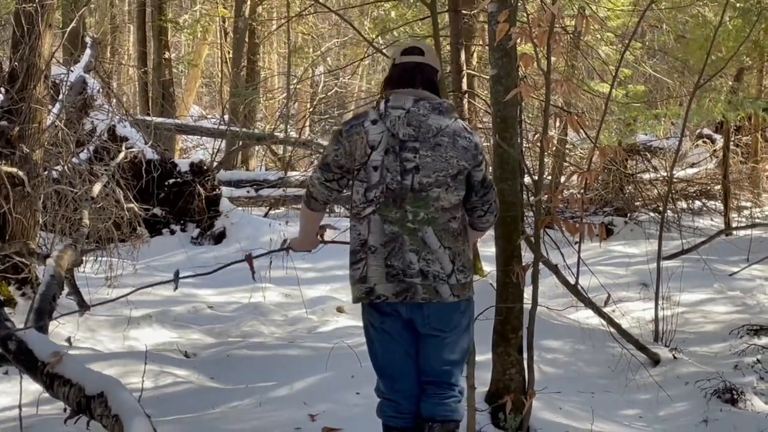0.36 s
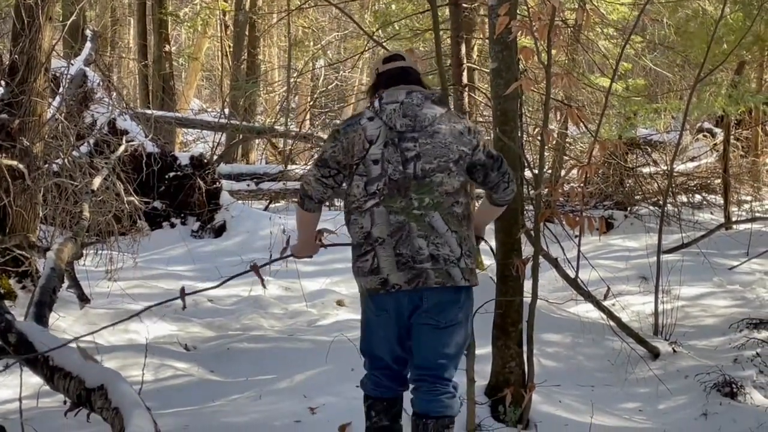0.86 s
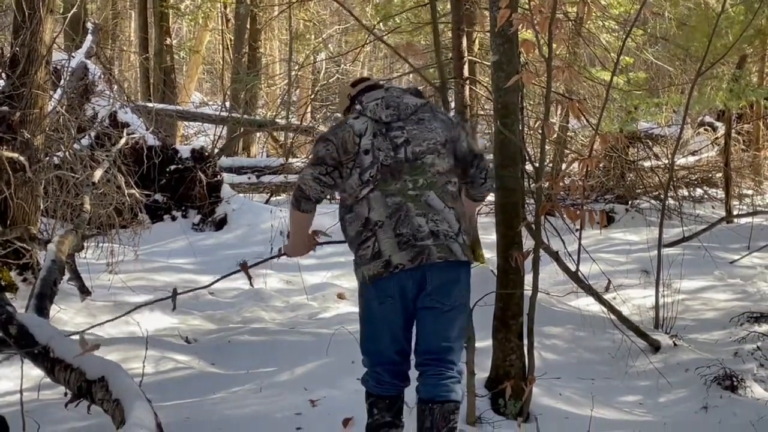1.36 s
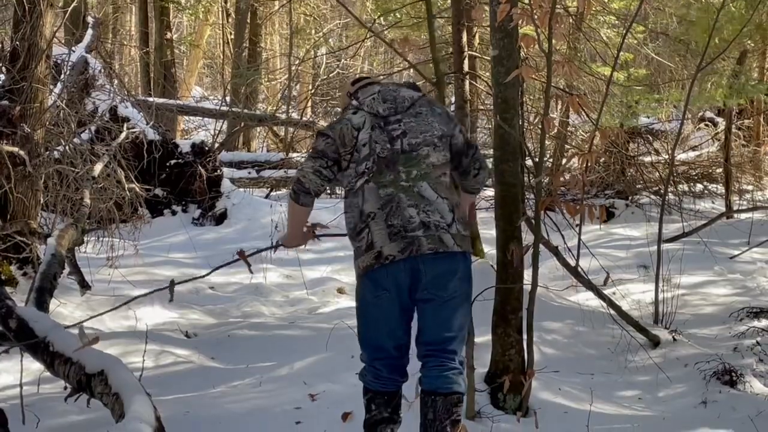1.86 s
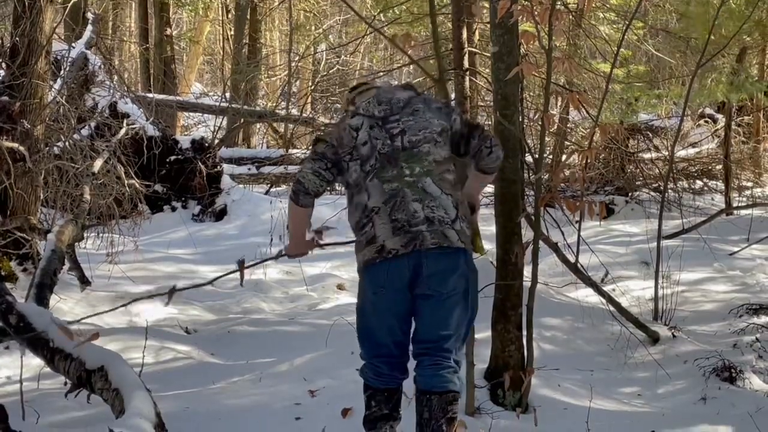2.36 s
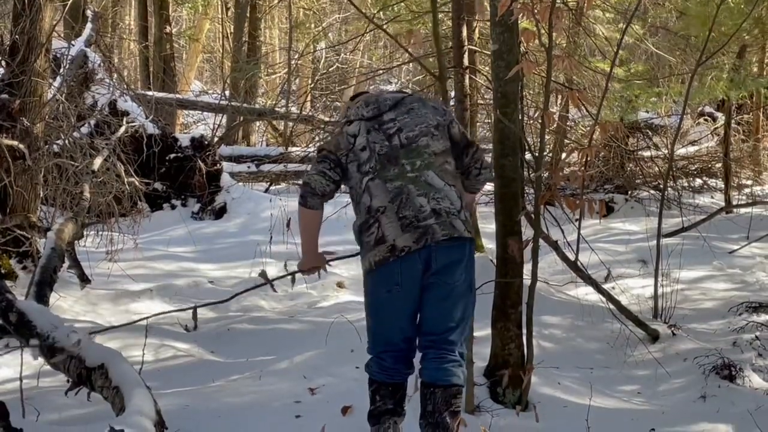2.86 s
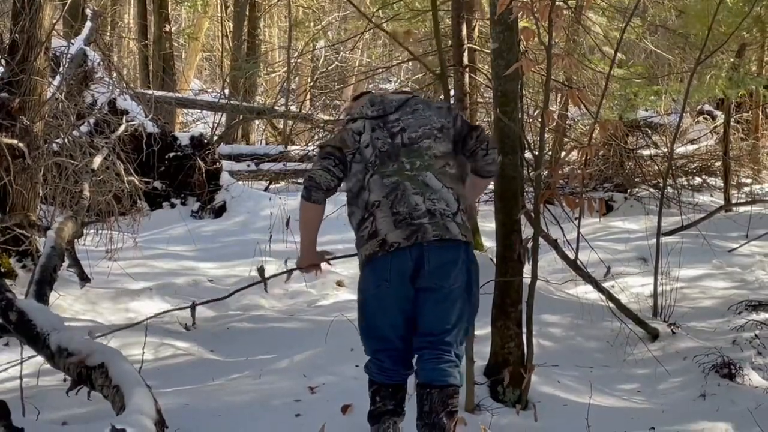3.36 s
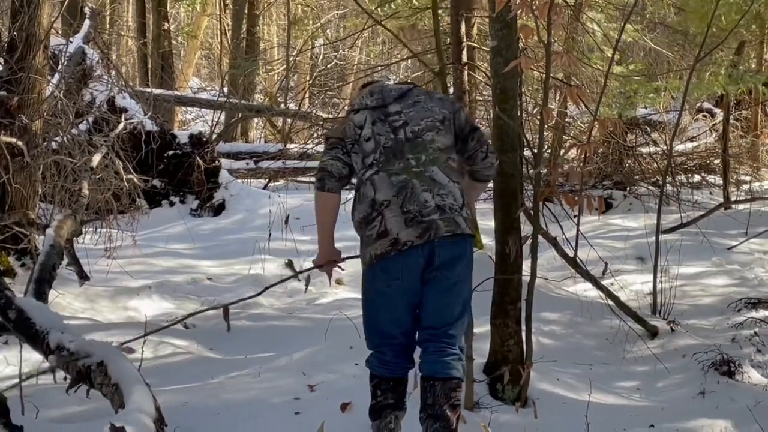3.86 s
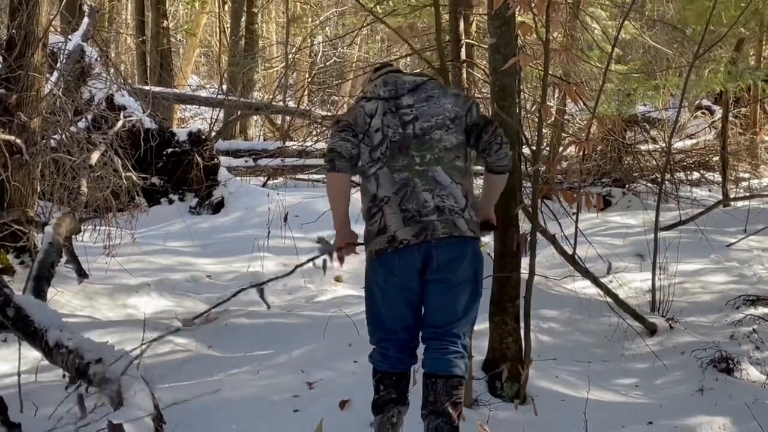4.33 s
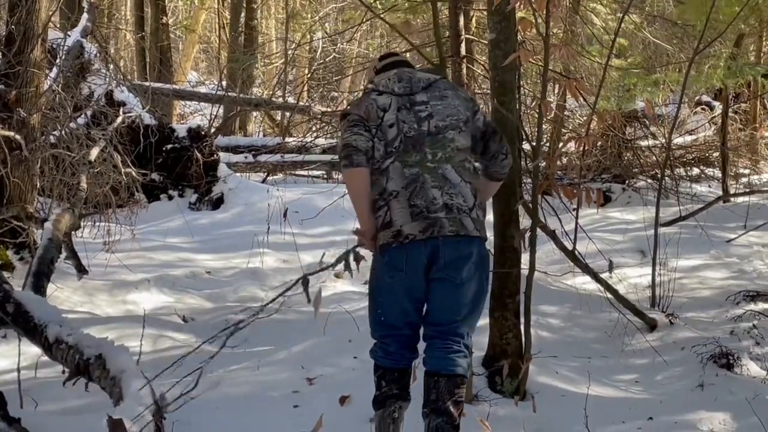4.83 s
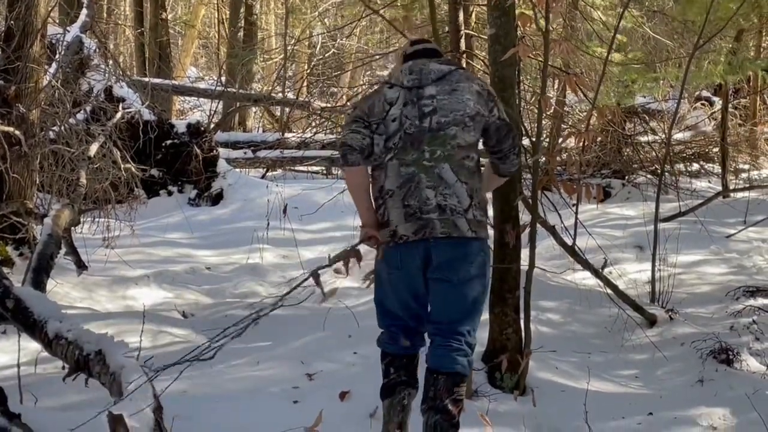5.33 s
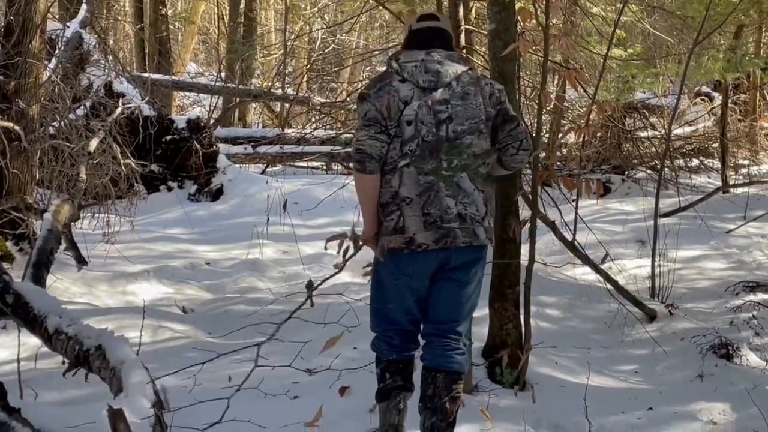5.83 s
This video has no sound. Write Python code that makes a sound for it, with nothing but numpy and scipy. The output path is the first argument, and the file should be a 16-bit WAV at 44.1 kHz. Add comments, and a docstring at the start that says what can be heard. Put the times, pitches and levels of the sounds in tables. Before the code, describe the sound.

In a quiet winter wood, a twiggy branch rustles briefly, sinks to a lull, then is tugged in short jerks. Twigs tick and snap, sharply near the middle. The thick end scrapes low on crusted snow, boots or wood thud softly, and stronger jerks come late before the rustle eases. Close, dry, clear stereo pickup.

```python
"""A leafy cut branch is tugged in short jerks through brush and over crusted snow, in faint winter-wood air.
Friction noise and tiny decaying ticks rustle from the start, with short jerks, and soon sink to a lull.
Twigs then snap as damped rings with cracks, and boots press the snow as thuds of sinking pitch. The drag grows,
with a sharp snap at 2.6 s; the bough's low filtered-noise scrape swells by 3.4 s, strong jerks follow at
4.1 to 4.7 s with a heavy thud at 4.6 s, and the rustle eases until it falls away after the last snaps."""
import sys
import numpy as np
from scipy import signal
from scipy.fft import rfft, irfft, next_fast_len
from scipy.io import wavfile
from scipy.ndimage import uniform_filter1d

SR = 44100
rng = np.random.default_rng(int(sys.argv[2]) if len(sys.argv) > 2 else 0)


def invert_db(x):
    """Field ratio 10**(x/20) for x, a level in decibels (scalar or array-like)."""
    u = np.asarray(x, float) / 20
    return 10 ** u


def int16_out(signal):
    """Quantize to a 16-bit WAV file."""
    q = np.round(np.clip(np.atleast_2d(signal).T, -1, 1) * 32767)
    wavfile.write(sys.argv[1], SR, q.astype(np.int16))


N = 262659
TIME = np.arange(N) / SR
FREQ = np.fft.rfftfreq(next_fast_len(N), 1 / SR)
SHORT, LONG = np.arange(512) / SR, np.arange(8192) / SR  # time axes of single events, s

# twigs snapping free: t/s, peak level before colouring/dB, ring f/Hz, crack gain against the ring/dB,
# drive of the leaves shivering after it/dB
TWIG_SNAPS = [(0.421, -27.5, 6940, 1, -48), (0.435, -32, 5150, 0, -54), (0.57, -36, 6100, -2, -76),
              (0.659, -29, 4660, -13, -48), (1.1985, -34, 3980, -33, -53), (1.2504, -23, 3760, -22, -45),
              (1.2533, -29, 2980, -16, -47), (1.2605, -39, 4260, -25, -55), (1.2985, -43, 3500, -22, -64),
              (1.3845, -22, 3400, -12, -52), (1.4015, -36, 4200, -28, -59), (1.436, -33, 3970, -31, -64),
              (1.5163, -23, 5200, -22, -54), (1.6212, -27, 4820, -12, -52), (1.687, -35, 3930, -12, -48),
              (1.777, -31, 5970, -28, -50), (1.8352, -35.5, 2200, -30, -66),
              (1.9065, -33, 4020, -11, -43.5), (1.9402, -30, 6000, -10, -53),
              (1.9438, -13.5, 6150, 0, -40.5), (2.1022, -26, 6000, -39, -58), (2.218, -38, 4140, -31, -44),
              (2.455, -38, 5900, -21, -49), (2.625, -8, 5750, -9, -56), (2.6854, -32.5, 2930, -23, -52),
              (2.7505, -38, 4500, -15, -60), (2.7712, -26.5, 6200, -30, -46),
              (2.8943, -30.5, 4000, -26, -63), (2.9435, -21.5, 6120, -38, -36.5),
              (3.0778, -21.5, 5600, -20, -48), (3.266, -30, 5700, -38, -42), (3.3343, -26, 2250, -24, -57),
              (3.452, -23, 6000, 0, -60), (3.475, -23, 5170, -20, -54), (3.5733, -35, 6400, -19, -42),
              (3.5972, -23, 5430, -15, -49), (3.6726, -22, 5300, -18, -50), (3.6886, -35, 5040, -20, -52),
              (3.75, -20, 5460, -19, -38.5), (3.8717, -36, 2300, -23, -68), (3.918, -22, 4700, -10, -46),
              (3.9915, -24, 6650, -41, -41), (4.063, -30, 4130, -34, -65), (4.1091, -32, 4970, -36, -65),
              (4.13, -38, 4760, -23, -53), (4.1415, -29, 5000, -22, -60), (4.2216, -30, 2960, -18, -49),
              (4.245, -24, 3000, -18, -52), (4.2713, -30, 4150, -27, -56), (4.369, -26, 5640, -9, -55),
              (4.3818, -23, 5000, -20, -58), (4.4555, -43, 2320, -15, -62), (4.5146, -29.5, 5600, -24, -46),
              (4.56, -29, 2150, -17, -52), (4.6847, -32, 2070, -27, -69), (4.9206, -35.5, 5470, -27, -55),
              (5, -31, 7100, -18, -49), (5.022, -27, 2900, -14, -46), (5.1646, -28, 6250, -24, -60),
              (5.3707, -25, 5600, -12, -67), (5.42, -32, 5550, -17, -62), (5.446, -27, 4830, -5, -52),
              (5.466, -38, 4000, -4, -52), (5.603, -39, 3680, -23, -58), (5.649, -28, 5170, -33, -46),
              (5.657, -35, 4520, -22, -46), (5.7243, -32, 2200, -10, -51), (5.8156, -39, 5730, -15, -44.5),
              (5.8636, -25, 3740, -9, -47)]


def along(points):
    """Interpolates (f/Hz, value) points linearly over logarithmic frequency, at every FREQ."""
    hz, value = np.transpose(points)
    return np.interp(np.log(FREQ + 1), np.log(hz + 1), value)


def colour(x, gain):
    """Linear filtering: multiplies the spectrum by a gain given at every frequency."""
    size = next_fast_len(N)
    return irfft(rfft(x, size) * gain, size)[:N]


def level(x, db):
    """Normalises mean power: scales x to an rms level in dB."""
    return x * invert_db(db) / np.sqrt(np.mean(x ** 2))


def walk(rate):
    """Random modulation: Gaussian values every 1 / rate s, joined by straight lines."""
    return 0.96 * np.interp(TIME * rate, np.arange(len(LONG)), rng.standard_normal(len(LONG)))


def place(shapes, times):
    """Superposition: adds short sounds at their times (s)."""
    out = np.zeros(N + len(LONG))
    for shape, s in zip(shapes, times):
        start = int(s * SR)
        out[start:start + len(shape)] += shape
    return out[:N]


def wood():
    """Broadband noise of faint air in the trees, slowly amplitude-modulated."""
    # spectrum of the air: f/Hz, relative density/dB
    air_spectrum = [(40, -10), (95, -2), (200, -6.5), (700, 1), (1200, -1), (2400, -6.5), (4000, -18),
                    (8000, -46), (16000, -50)]
    air = colour(rng.standard_normal(N), invert_db(along(air_spectrum)))
    return level(air * invert_db(0.22 * walk(4.0)), -57.5)


def steps(push_s=0.0095, extra_hz=340, drop_s=0.0036):
    """Damped oscillation whose pitch sinks as the snow packs under boots or the bough bumps over lumps."""
    # thuds: t/s, level before onset and decay/dB, settled f/Hz, settled cycles until decay to 1/e
    thuds = [(0.685, -42, 63, 1.6), (0.726, -33.5, 231, 1.75), (0.732, -40, 62, 1.2),
             (2.227, -39, 108, 1.2), (2.944, -30, 140, 0.6), (3.169, -41, 148, 1.9), (3.38, -34, 264, 0.93),
             (3.898, -37, 140, 0.92), (4.151, -40, 148, 0.77), (4.279, -49, 170, .83),
             (4.427, -43, 162, .83), (4.47, -36, 65.4, 1.4), (4.508, -39, 75, 0.7), (4.569, -21, 240, 0.72),
             (4.741, -44, 400, .83)]
    s, db, hz, cycles = np.transpose(thuds)[:, :, None]
    # the pitch starts extra_hz above its settled value
    turns = hz * LONG + extra_hz * drop_s * (1 - np.exp(-LONG / drop_s))
    thud = np.sin(2 * np.pi * turns) * np.exp(-LONG * hz / cycles)
    onset = 1 - np.exp(-LONG / push_s)
    return place(invert_db(db) * thud * onset, s[:, 0])


def drag(rise_s=0.012, fall_s=0.013, swell_db=1, treble_loss=0.45):
    """Power sum of steady pull and jerks: rustle drive, finest-twig share and jerk excess over the pull, in dB."""
    # steady pull on the branch: t/s, rustle drive/dB, share of the finest twigs before treble loss/dB
    steady_pull = [(0.0, -52.5, -5.5), (0.11, -62, -7.5), (0.33, -72, -1), (0.55, -60, -6),
                   (0.94, -66.5, -9), (1.15, -59.5, -9), (1.5, -54, -10.5), (1.85, -49, -10),
                   (2.3, -51, -9), (2.5, -49.5, -8.5), (3.1, -51, -8), (3.4, -47.5, -8), (4.1, -52.5, -7),
                   (4.5, -49.5, -10.5), (5.1, -57.5, -6), (5.55, -56.5, -10), (5.86, -58, -8),
                   (5.96, -72, -4)]
    # jerks that drag the twigs faster for a moment: start t/s, length/s, rustle drive before shaping/dB
    tugs = [(0.0, 0.092, -59), (0.13, 0.036, -59), (0.43, 0.016, -70), (0.662, 0.048, -56.5),
            (1.026, 0.09, -54), (1.172, 0.081, -49.5), (1.309, 0.078, -48), (1.39, 0.021, -52),
            (1.428, 0.089, -48.5), (1.58, 0.041, -49.5), (1.684, 0.032, -47), (1.904, 0.05, -48),
            (2.004, 0.066, -47.5), (2.096, 0.074, -44), (2.226, 0.035, -43.5), (2.317, 0.055, -45.5),
            (2.437, 0.051, -44.5), (2.535, 0.068, -48), (2.619, 0.082, -49), (2.748, 0.023, -47.5),
            (2.82, 0.084, -48), (2.928, 0.086, -44.5), (3.045, 0.046, -43.5), (3.141, 0.043, -44),
            (3.306, 0.052, -45.5), (3.43, 0.067, -46), (3.53, 0.084, -44.5), (3.652, 0.032, -43),
            (3.749, 0.061, -47.5), (3.86, 0.074, -43.5), (3.977, 0.041, -46), (4.116, 0.058, -38.5),
            (4.2, 0.14, -47.5), (4.371, 0.092, -38.5), (4.503, 0.016, -52), (4.56, 0.039, -45.5),
            (4.676, 0.063, -39.5), (4.756, 0.041, -50.5), (4.832, 0.06, -47), (4.958, 0.087, -49.5),
            (5.197, 0.034, -48.5), (5.334, .12, -49.5), (5.714, 0.027, -48.5), (5.775, 0.016, -50)]
    at, pull_db, fine_db = np.transpose(steady_pull)
    pull_db = np.interp(TIME, at, pull_db)
    s, length, db = np.transpose(tugs)[:, :, None]
    # a jerk gathers speed until it stops: its gain climbs from -2 to -1 dB
    swell = invert_db(swell_db * (np.clip(LONG / length, 0, 1) - 2))
    rise = np.clip(LONG / rise_s, 0, 1) * swell
    fall = np.exp(-np.maximum(LONG - length, 0) / fall_s)
    jerks = place(invert_db(db) * rise * fall, s[:, 0])
    drag_db = 20 * np.log10(np.hypot(invert_db(pull_db), jerks))
    jerk_db = drag_db - pull_db
    # treble_loss: dB of share the finest twigs lose per dB of jerk excess
    return drag_db, np.interp(TIME, at, fine_db) - treble_loss * jerk_db, jerk_db


def bough(jolt_slope=0.25, jolt_s=0.2, rumble_slope=0.3, wander_db=1.5):
    """Sliding friction of the thick end on the crust: low-passed noise, unevenly modulated, and a rumble."""
    # spectrum of the scrape: f/Hz, relative density/dB
    scrape_spectrum = [(80, -11), (110, -1), (150, 0), (400, -2.5), (800, -5), (1300, -11), (2200, -10.5),
                       (4000, -36)]
    # spectrum of the deep rumble: f/Hz, relative density/dB
    rumble_spectrum = [(22, -27), (45, -15), (58, 3), (67, 4.5), (80, -1), (130, -38)]
    # weight of the thick end on the crust: t/s, scrape gain/dB
    load = [(0.0, -56), (0.75, -55), (1.4, -57), (2.2, -53), (2.6, -54), (2.94, -50), (3.1, -55.5),
            (3.4, -48.5), (3.7, -52.5), (3.9, -50.5), (4.5, -50), (5.0, -54), (5.96, -55)]
    drag_db = drag()[0]
    weight_db = np.interp(TIME, *np.transpose(load))
    # each jerk on the twigs also jolts the bough, by how far the drag exceeds its local mean
    jolt_db = jolt_slope * (drag_db - uniform_filter1d(drag_db, int(jolt_s * SR)))
    uneven = rng.standard_normal(N) * invert_db(1.92 * walk(25) + jolt_db)
    slide = colour(uneven, invert_db(along(scrape_spectrum)))
    # the rumble follows the weight, rumble_slope dB per dB
    swell_db = wander_db * walk(9) + rumble_slope * weight_db
    deep = colour(rng.standard_normal(N) * invert_db(swell_db), invert_db(along(rumble_spectrum)))
    return level(slide, 0) * invert_db(weight_db) + level(deep, -62.5)


def snaps(rise_s=0.00016, crack_s=0.0005, cycles=6, knock_hz=2090, knock_db=-11, knock_s=0.0016):
    """Impulsive release of stored strain: a noisy crack excites two damped twig modes and the branch's own."""
    s, db, hz, crack_db, _ = np.transpose(TWIG_SNAPS)[:, :, None]
    noise = rng.standard_normal((len(TWIG_SNAPS), len(SHORT)))
    onset = 1 - np.exp(-SHORT / rise_s)
    click = 2.16 * (SHORT == SHORT[3])  # a single sample
    splinters = noise * np.exp(-SHORT / crack_s) * onset + click
    crack = 7.2 * signal.lfilter([1, 0.35], [1], splinters)
    # smoothed noise roughens the pair of rings
    rough = uniform_filter1d(noise, size=7, axis=1)
    modes = np.sin(2 * np.pi * hz * SHORT) + 0.6 * np.sin(2 * np.pi * 0.7 * hz * SHORT)
    ring = modes * (1 + 1.4 * rough) * np.exp(-SHORT * hz / cycles)
    knock = np.sin(2 * np.pi * knock_hz * SHORT) * np.exp(-SHORT / knock_s)
    snap = invert_db(crack_db) * crack + (ring + invert_db(knock_db) * knock) * onset
    snap = invert_db(db) * snap / np.abs(snap).max(axis=1, keepdims=True)
    tilt_db = along([(500, -12), (1500, -2), (5000, 0.4), (10000, 4), (16000, 0)])
    return colour(place(snap, s[:, 0]), invert_db(tilt_db))


def ticks(rate, spread_db, ring_s):
    """Random point process: scattered contacts, many small and few large, each a noise puff decaying in ring_s."""
    size_db = np.minimum(spread_db * rng.exponential(size=N), 10.5)
    hit = (rng.random(N) < rate / SR) * invert_db(size_db)
    puff = signal.lfilter([1], [1, -np.exp(-1 / (ring_s * SR))], hit)
    return level(puff * rng.standard_normal(N), 0)


def crackle(count=1500, low_hz=2000, high_hz=8000, cycles=1.54, spread_db=3.0):
    """Heavily damped oscillations: single twigs flick, each a few cycles at its own random pitch."""
    when, pitch, size = rng.random((count, 3)).T[:, :, None]
    hz = low_hz * (high_hz / low_hz) ** pitch
    size_gain = invert_db(-spread_db * np.log(size + 0.022))
    flick = size_gain * np.sin(2 * np.pi * hz * SHORT) * np.exp(-SHORT * hz / cycles)
    return place(flick, when[:, 0] * N / SR)


def shakes(rise_s=0.00047, fall_s=0.0052):
    """Transient response: the envelope of leaves shivering after each snap, rising fast and decaying."""
    shiver = (1 - np.exp(-LONG / rise_s)) * np.exp(-LONG / fall_s)
    return place([invert_db(row[-1]) * shiver for row in TWIG_SNAPS], [row[0] for row in TWIG_SNAPS])


def rustle(thick_gain=0.12):
    """Contact and friction noise in three bands: twigs of three sizes tick over a swish, the finest in the treble."""
    # spectrum of leaves and twigs: f/Hz, relative density/dB
    leaf_spectrum = [(700, -1), (1400, 1), (2100, -5), (3300, -1.5), (5000, -0.5), (6500, -6.5), (9000, -2),
                     (12000, -9.5), (14000, -14.5), (16000, -16.5)]
    drag_db, fine_db, jerk_db = drag()
    force = invert_db(drag_db) + shakes()
    octave = np.log2(FREQ + 1)
    common = ticks(350, 8.3, 0.00074)  # contacts shared by all three sizes
    bands = []
    # centre f/Hz, half-width/octave, gain of own ticks/dB, flicker scale/dB
    for hz, octaves, tick_db, flicker_db in [(2200, 0.7, -19.0, 3.5), (5520, 0.68, -5.5, 2.5),
                                             (10560, 1.0, -8.0, 3.9)]:
        swish = invert_db(flicker_db * walk(45)) * rng.standard_normal(N)
        grain = swish + invert_db(tick_db) * ticks(300, 1.9, 0.0027) + invert_db(-5.5) * common
        band_pass = np.exp(-((octave - np.log2(hz)) / octaves) ** 2 ** 2)
        bands.append(colour(grain, invert_db(along(leaf_spectrum)) * band_pass))
    low, middle, fine = bands
    # the thickest twigs gain thick_gain dB per dB a jerk stands over the pull
    body = level(low * invert_db(thick_gain * jerk_db) + middle, -1.04) + level(crackle(), -8.0)
    return (body + level(fine, 6.1) * invert_db(fine_db)) * force


def scene():
    """Partial coherence: part of the sound differs between the two channels, and snaps lean left."""
    # share unlike in the two channels: f/Hz, gain/dB
    unlike_share = [(60, -16), (300, -15), (700, -10), (950, -4), (1300, -9), (1700, -3), (2100, -13),
                    (2400, -24), (6200, -26), (7000, -11), (8200, -27), (9300, -13), (10200, -12),
                    (11000, -27), (12400, -21), (13300, -9), (14500, -24)]
    cracks = snaps()
    direct = rustle() + cracks + bough() + steps() + wood()
    apart = colour(rustle() + bough() + wood(), invert_db(along(unlike_share))) + invert_db(-17.5) * cracks
    return np.array([direct + apart, direct - apart])


def top_cut(x):
    """Nothing passes above the cut-off."""
    return signal.sosfilt(signal.butter(12, 16490, fs=SR, output="sos"), x)


def record(dry):
    """Two-port reception: phase and level differ with frequency; one colouring and low-pass filters both."""
    # phase by which the left port leads: f/Hz, phase/rad
    port_phase = [(0, 0), (130, -0.33), (340, -0.45), (1030, 0.4), (1550, -0.3), (1810, 0.4), (2070, 0.0),
                  (6720, -0.0), (7670, -2.8), (8870, -3.5), (10200, -5.3), (10400, -6.2), (12900, -6.3),
                  (13900, -9.3), (16000, -9.5)]
    # left minus right: f/Hz, level/dB
    port_balance = [(60, 0), (250, 1.5), (700, -1.5), (1000, 0), (1350, -2), (1700, -5.5), (2050, 1.5),
                    (2500, 0), (16000, 0)]
    # colour of the case, hollow near 1 and 1.7 kHz, then a steep low-pass of the whole sound: f/Hz, gain/dB
    colour_and_low_pass = [(850, -0.5), (980, -4.5), (1250, 0.5), (1700, -9), (2000, -1), (2500, -1.5),
                           (15720, 1), (16000, 13), (16450, -4), (16600, -60)]
    hz, rad = np.transpose(port_phase)
    # each port takes half of the difference
    half = np.exp(0.5j * np.interp(FREQ, hz, rad)) * invert_db(along(port_balance) / 2)
    both = invert_db(along(colour_and_low_pass))
    ports = np.array([colour(dry[0], both * half), colour(dry[1], both / half)])
    return top_cut(ports)


dry = scene()
out = record(dry)
int16_out(out)
```